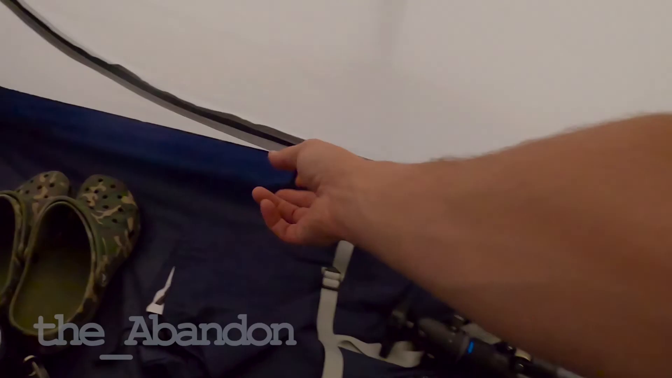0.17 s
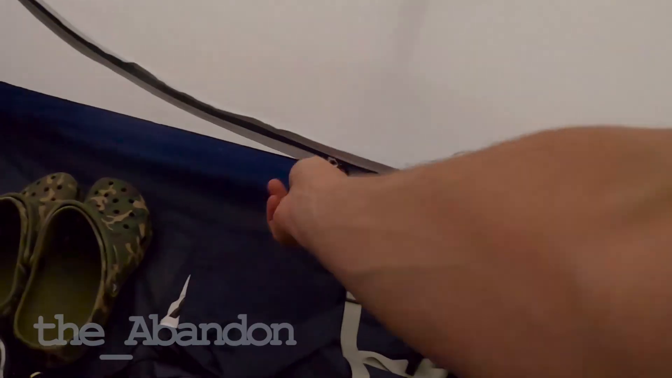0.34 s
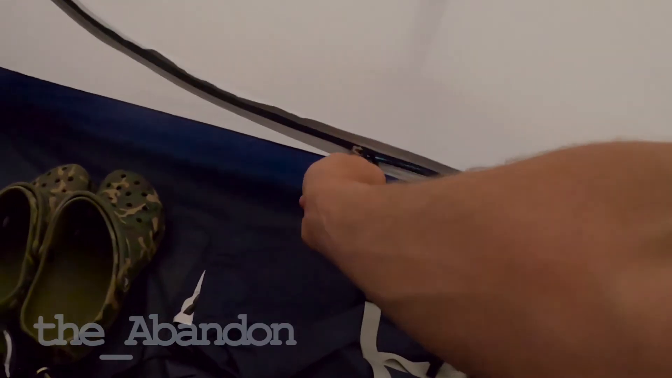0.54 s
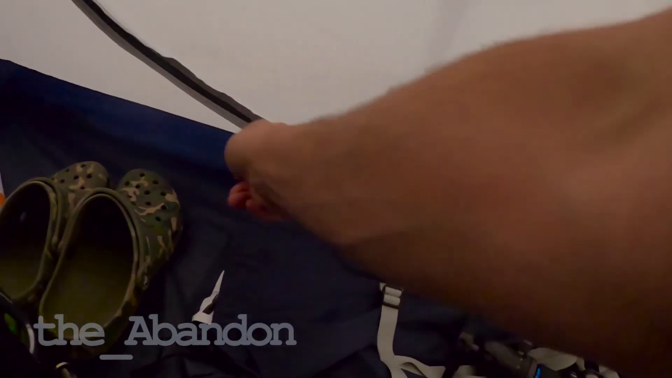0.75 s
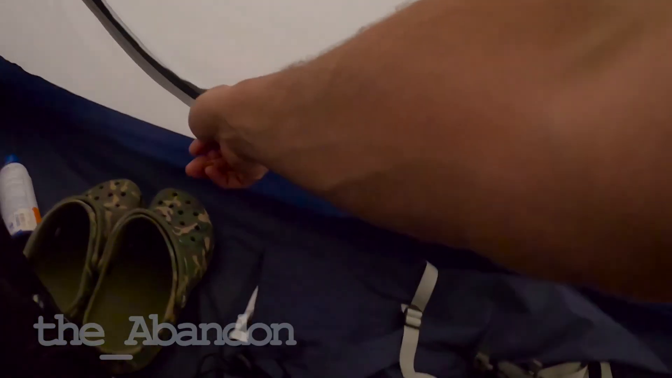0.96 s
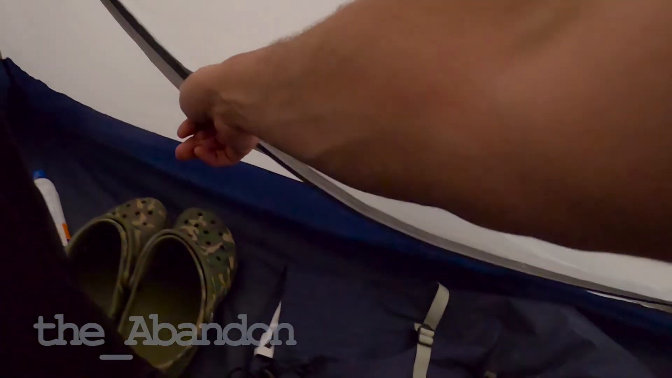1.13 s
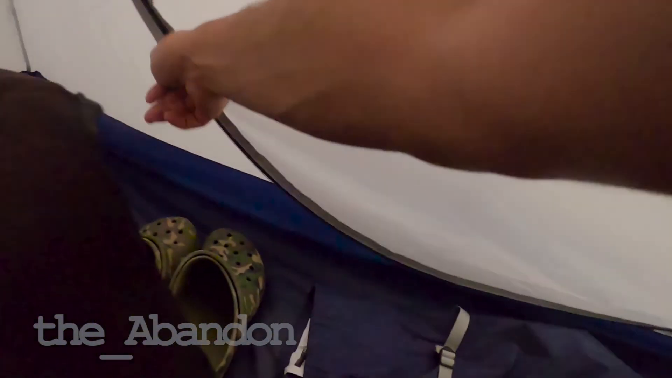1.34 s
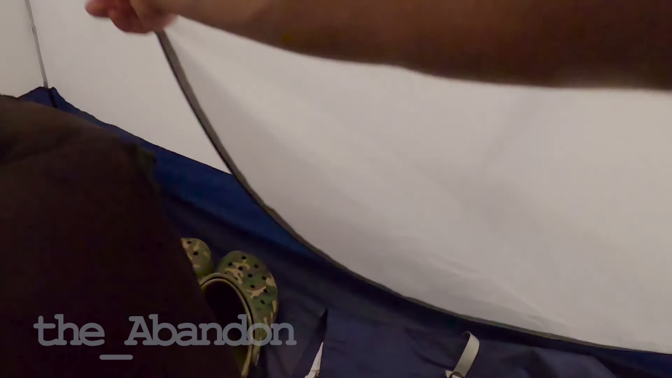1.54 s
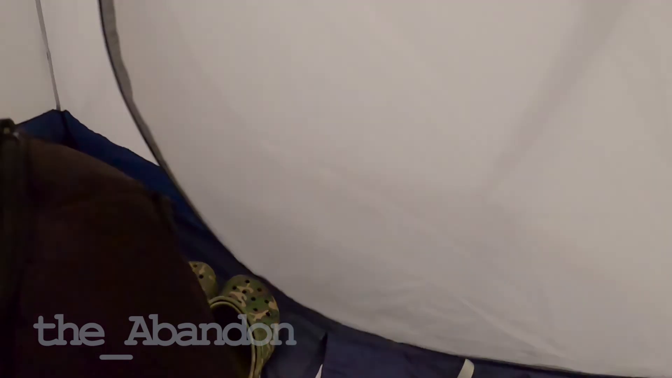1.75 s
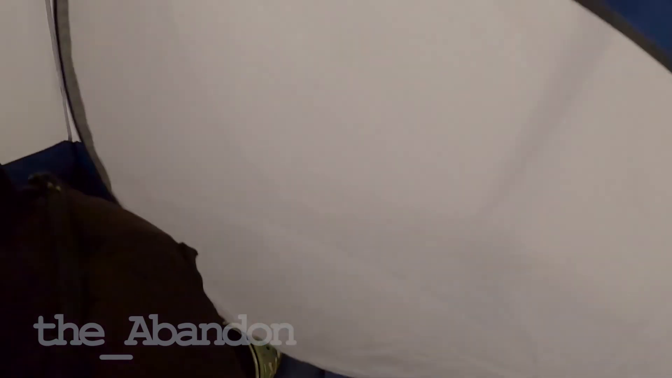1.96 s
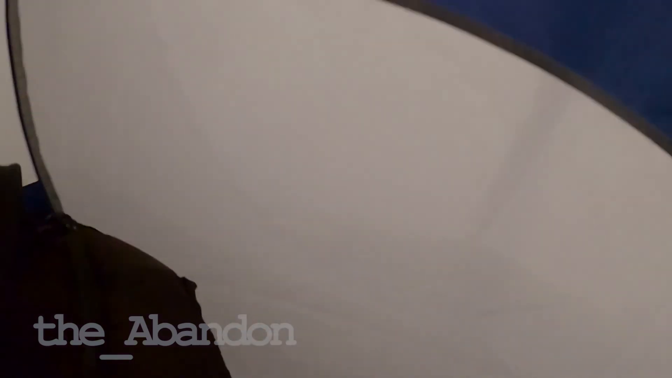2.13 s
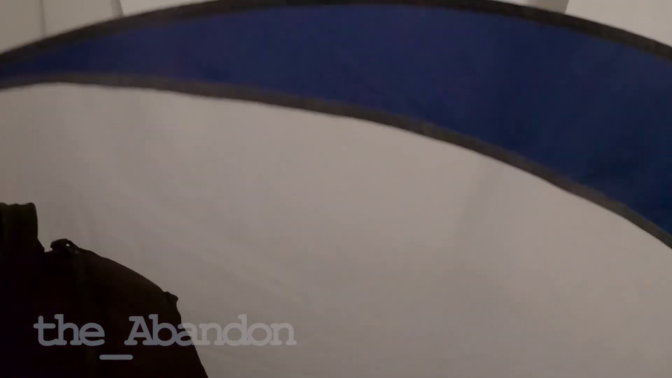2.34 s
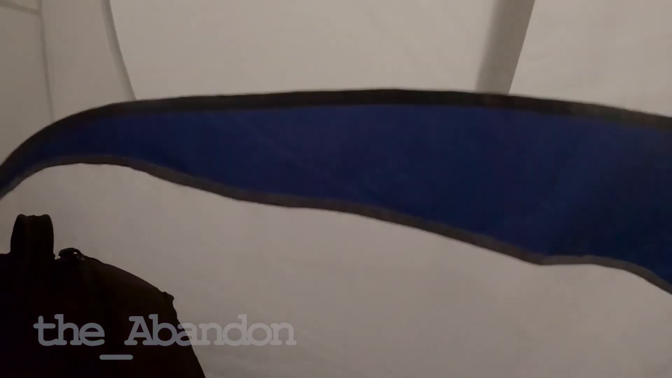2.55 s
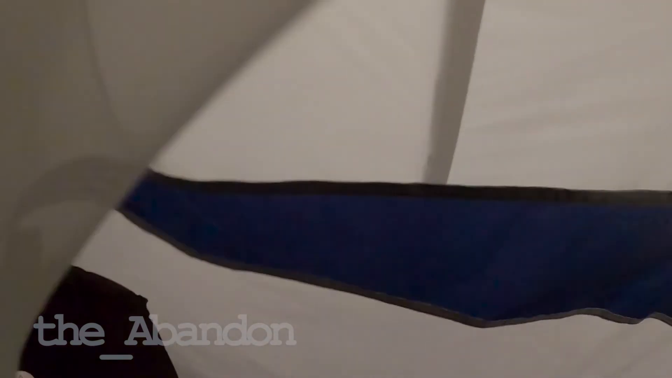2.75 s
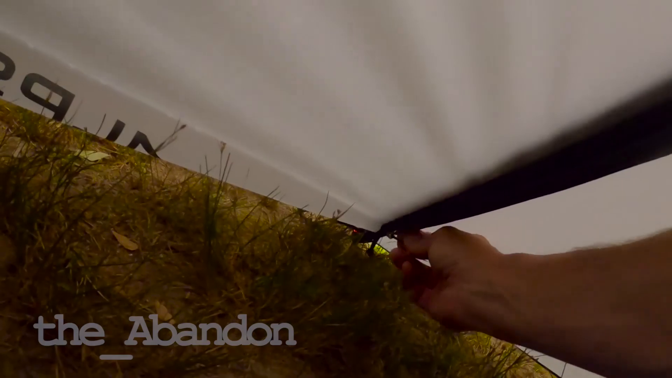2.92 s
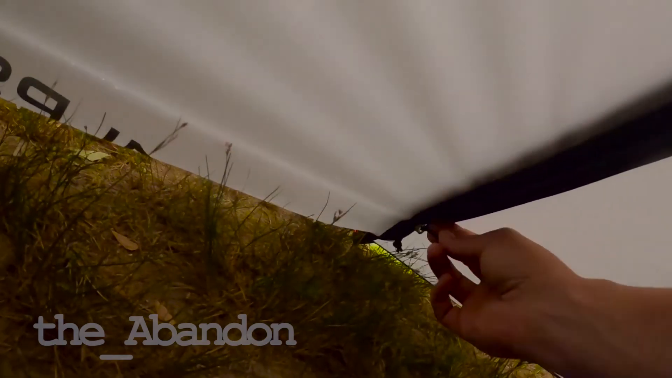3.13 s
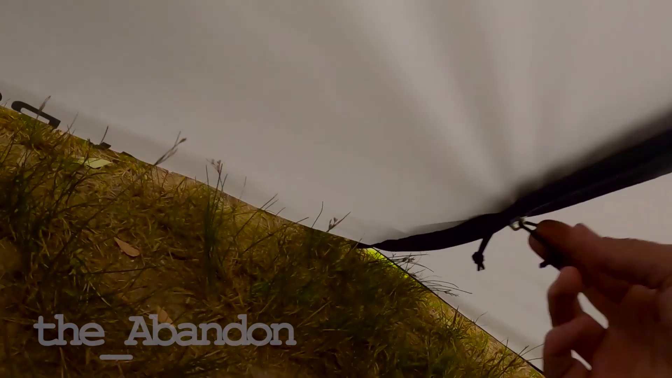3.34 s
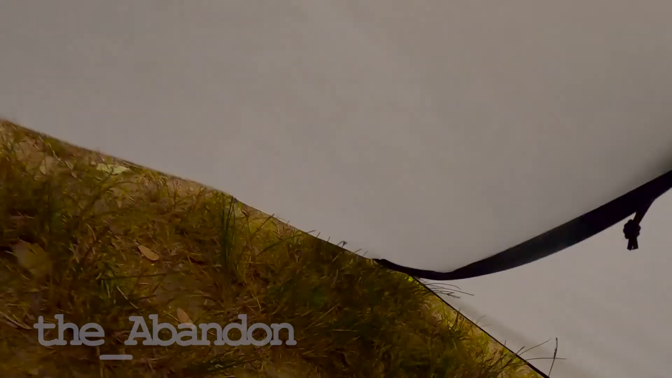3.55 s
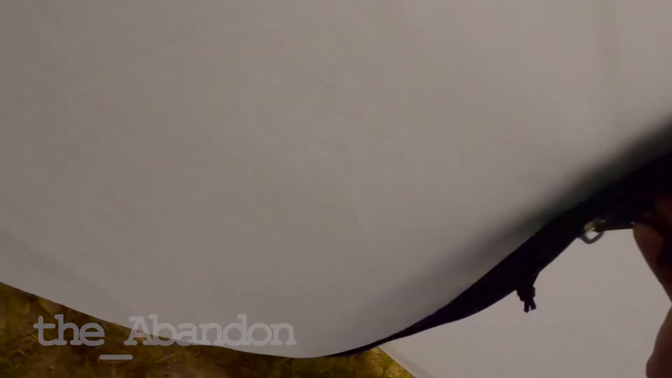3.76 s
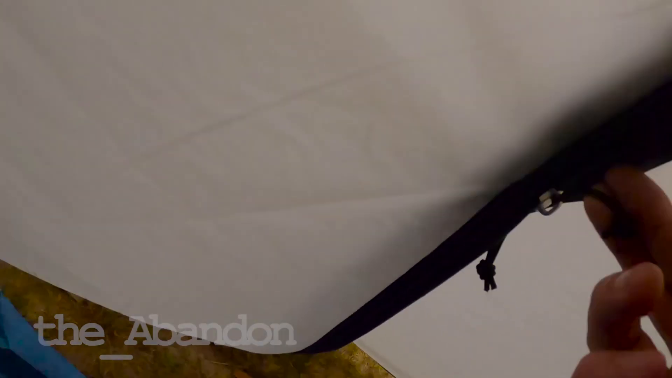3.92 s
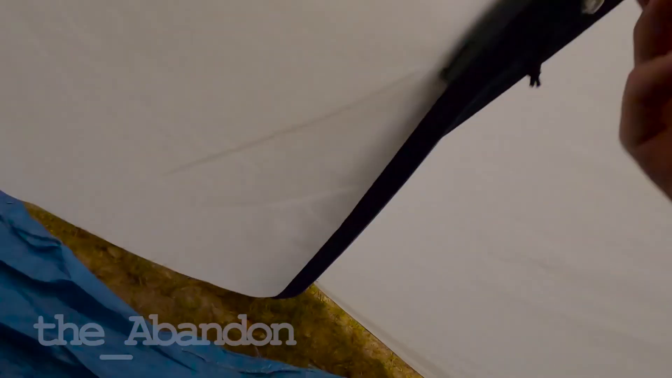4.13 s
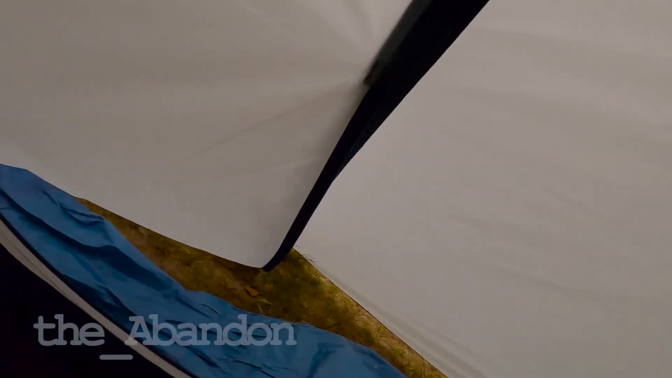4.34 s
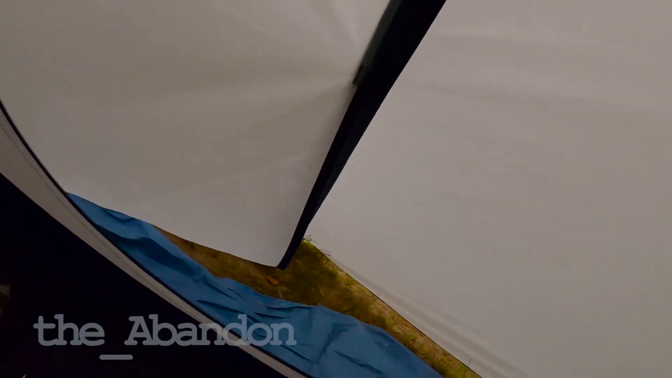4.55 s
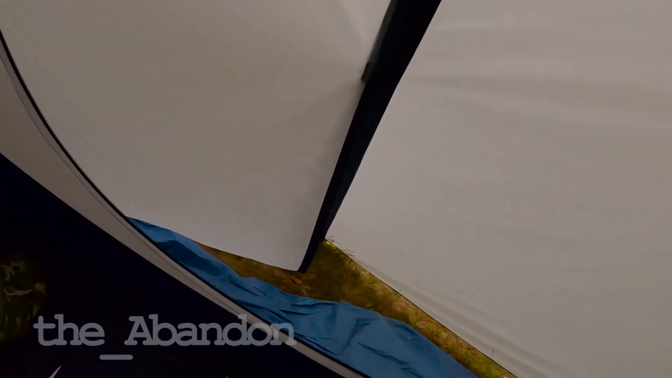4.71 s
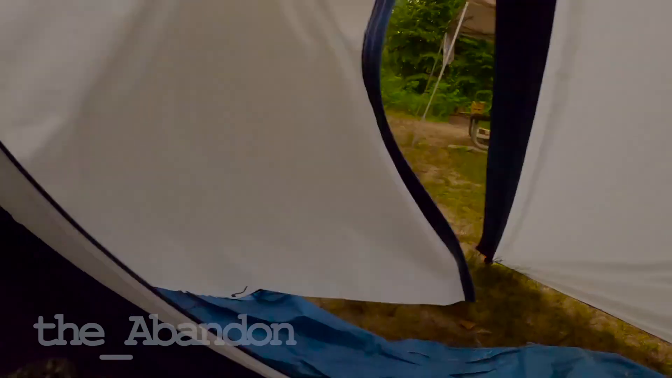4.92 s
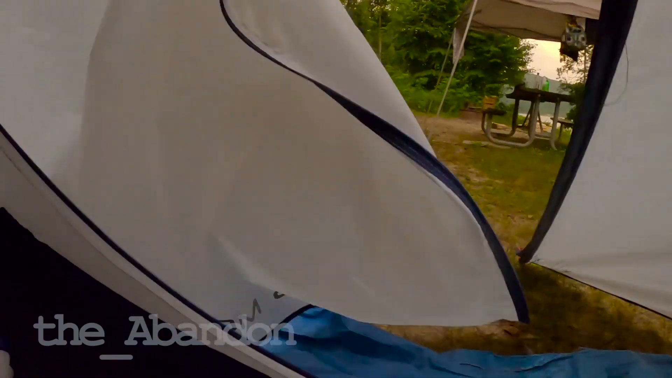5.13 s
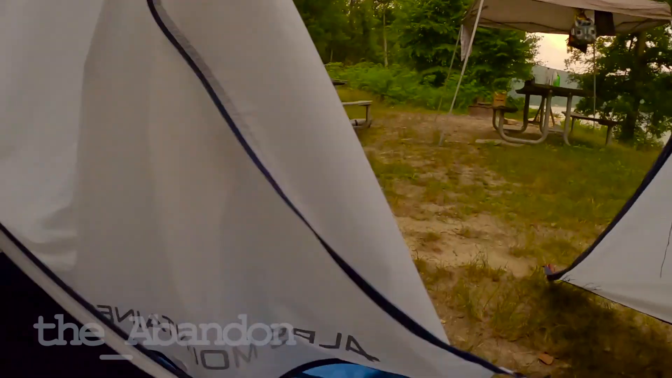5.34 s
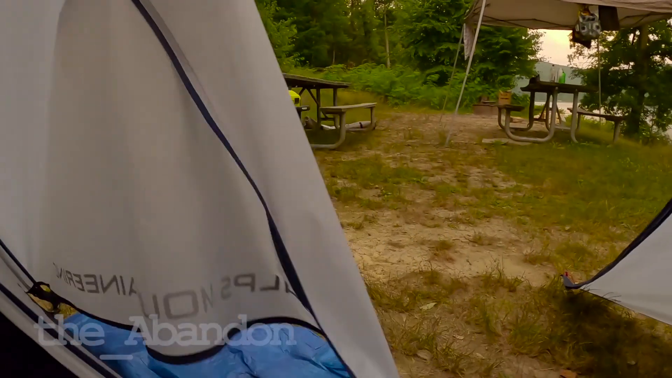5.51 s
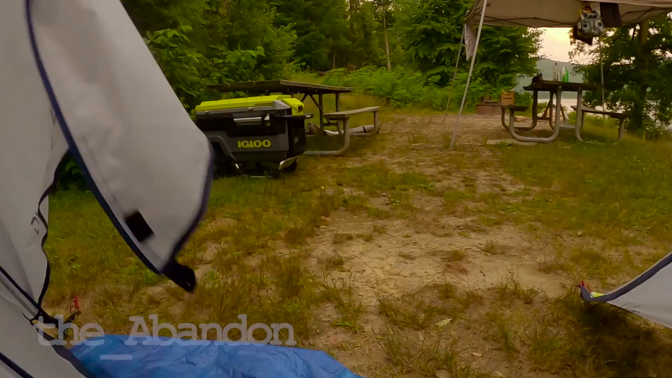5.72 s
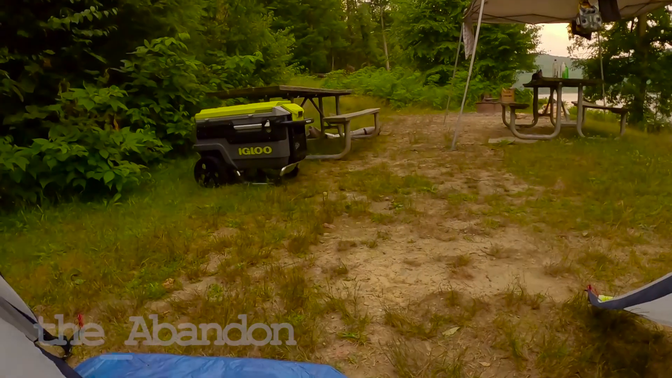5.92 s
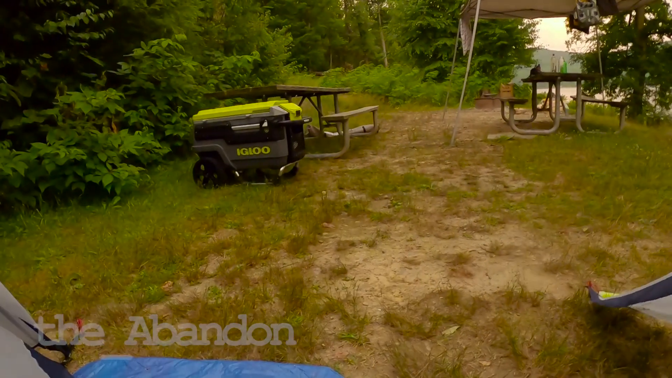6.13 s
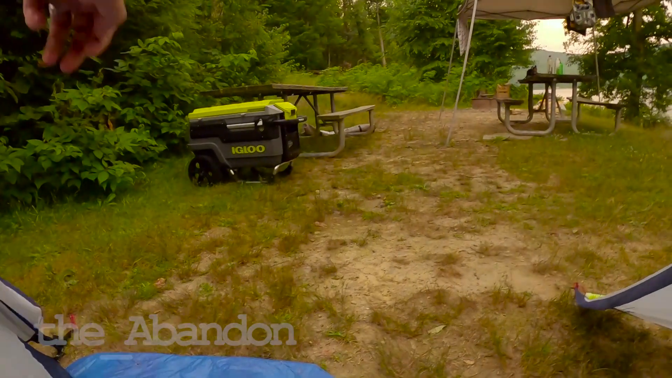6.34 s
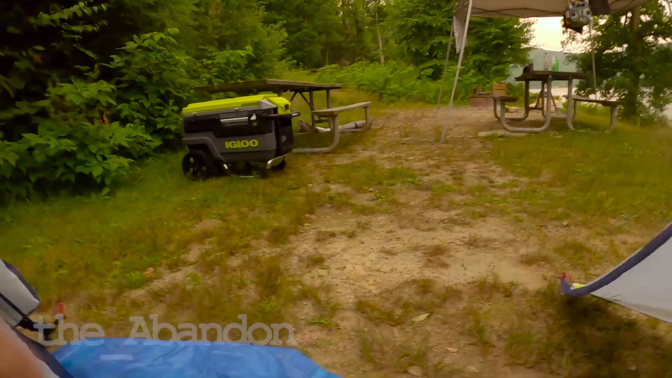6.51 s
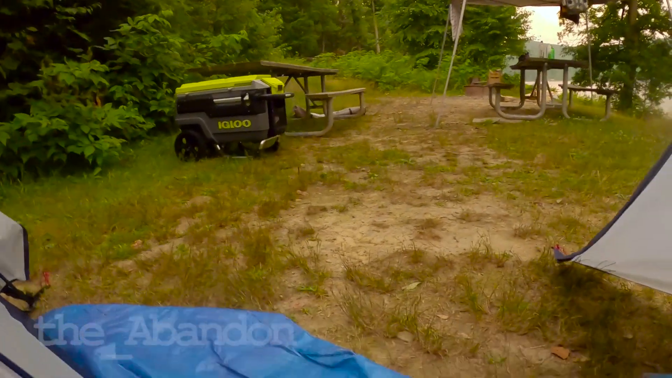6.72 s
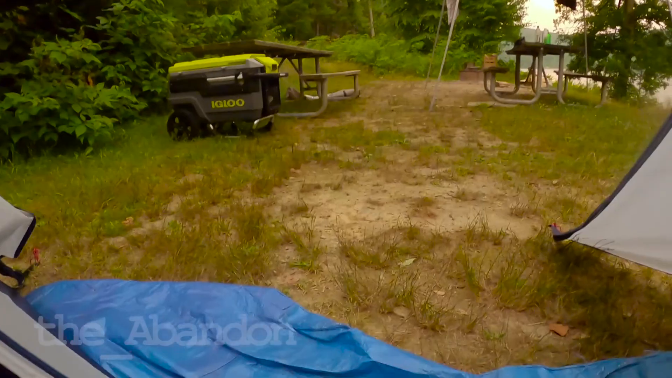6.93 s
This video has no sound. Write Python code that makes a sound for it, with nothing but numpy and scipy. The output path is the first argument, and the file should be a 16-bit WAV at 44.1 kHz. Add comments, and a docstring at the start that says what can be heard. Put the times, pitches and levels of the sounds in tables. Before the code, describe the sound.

Inside a small tent, very close and dry, a faint hiss precedes a light zipper pulled for two seconds, its buzz wavering and rising. A thump marks its end, then a heavier zipper starts with separate teeth and accelerates into a loud coarse rasp with the fabric wall drumming. A sharp nylon snap and rustle follow as the flap swings away, then quiet.

```python
"""Two door zippers are pulled open one after the other inside a tent, close to a small stereo camera.
The slider excites overtones of the tooth rate and scraping noise; the taut wall drums at the lowest three.
Then the flap is swept aside: filtered noise rustles, short noise bursts snap and damped swings thump.
Faint thin whistles are wavering near-sines; puffs of low-pressure noise and a steady hiss lie beneath."""
import sys
import numpy as np
from scipy import signal
from scipy.fft import rfft, irfft
from scipy.io import wavfile
from scipy.ndimage import uniform_filter1d

SR = 44100
rng = np.random.default_rng(int(sys.argv[2]) if len(sys.argv) > 2 else 0)


def master_out(mix):
    """Clip the mix to full scale and print it as 16-bit PCM to the path in sys.argv[1]."""
    frames = np.transpose(np.atleast_2d(mix))
    ceiling = np.clip(frames, -1, 1)
    pcm = np.round(ceiling * 32767).astype(np.int16)
    wavfile.write(sys.argv[1], SR, pcm)


N = 307465
EDGE_HZ = 15500  # upper band limit

# Rasp spectra, first the far light zipper, then the near heavy one: (frequency [Hz], gain [dB])
RASP_COLOURS = [
    [(60, -25), (200, -10), (600, -13.5), (1200, -9.5), (2200, -5), (3700, -2.5), (5300, -0.5), (7500, -6),
     (11000, -21.5), (15500, -31)],
    [(60, -25), (200, -6), (600, -3), (1200, -1), (2200, -4.5), (3800, 0.5), (5300, -4), (7500, -9),
     (11000, -20.5), (15500, -32.5)],
]
# Spectrum of sliding nylon, also used for the steady hiss: (frequency [Hz], gain [dB])
NYLON_COLOUR = [(90, 0), (150, -0.5), (380, -3), (600, -10), (1400, -7.5), (5000, -6), (7800, -11),
                (9000, -22), (12500, -29), (15500, -48)]


def gain_of(db):
    """Level to amplitude: 20 dB is a factor of ten."""
    return 10 ** (np.asarray(db) / 20)


def evened(x):
    """Normalization to an rms of 1."""
    return x / np.sqrt(np.mean(x ** 2) + 1e-20)


def read(points, hz):
    """Spectrum interpolated on a logarithmic frequency axis."""
    f, value = np.transpose(points)
    return np.interp(np.log(hz + 1), np.log(f + 1), value)


def add(mix, s, sound):
    """Superposition: a sound is summed into the mix from time s on."""
    part = mix[:, round(s * SR):][:, :sound.shape[-1]]
    part += sound[..., :part.shape[1]]


def unroll(rows):
    """Linear interpolation of a curve table: its start time and each column at every sample."""
    s, *columns = np.transpose(rows)
    t = np.arange(s[0], s[-1], 1 / SR)
    return s[0], [np.interp(t, s, c) for c in columns]


def drift(size, hz):
    """Low-passed noise of rms 1: a slow random course that changes about hz times a second."""
    span = int(SR / hz) + 1
    smooth = uniform_filter1d(rng.standard_normal(size), span)
    return evened(uniform_filter1d(smooth, span))


def colour(x, points):
    """Linear filtering: the spectrum is multiplied by the gains of a table."""
    gain = gain_of(read(points, np.fft.rfftfreq(len(x), 1 / SR)))
    return irfft(rfft(x) * gain, len(x))


def band(x, lo_hz, hi_hz):
    """Band-pass filtering between two frequencies."""
    return signal.sosfilt(signal.butter(2, [lo_hz, hi_hz], "bandpass", fs=SR, output="sos"), x)


def resonate(x, hz, width_hz):
    """Moving resonance by heterodyning: shift the curve hz to zero, smooth, and shift back."""
    turn = np.exp(2j * np.pi * np.cumsum(hz) / SR)
    r = np.exp(-np.pi * width_hz / SR)
    return 2 * (turn * signal.lfilter([1 - r], [1, -r], x / turn)).real


def panned(x, pan_db):
    """Interchannel level difference: left exceeds right by pan_db."""
    return np.array([x * gain_of(pan_db / 2), x * gain_of(-pan_db / 2)])


def placed(x, s):
    """Level difference that follows the hand from time s on, with faded ends."""
    # Side of the hand as the camera turns: (time [s], left minus right [dB])
    side = [(0, 4.5), (.72, -1.5), (1.4, -2), (2.15, 2), (2.9, 1.5), (3.001, -2.5), (4.1, -4.5), (4.9, -1),
            (5.499, -0.5), (5.75, 3), (6.97, 4.5)]
    t = s + np.arange(len(x)) / SR
    fade = signal.windows.tukey(len(x), 300 / len(x))
    return panned(x * fade, np.interp(t, *np.transpose(side)))


def zipper(rows, rasp, ring, blur_hz):
    """Periodic impact: knocks are overtones of the tooth rate, scraping pulses with it, the wall drums below."""
    ring_wander, ring_width = 0.04, .22  # in log frequency
    slow_body_db = 22  # slow knocks are fuller in the low overtones
    fizz = 0.37  # scraping that stays on above the knocks
    uneven_db = [2.6, 3.8, 4.2]  # unsteadiness of the three drum tones

    s, (hz, rasp_db, *drum_db) = unroll(rows)
    size = len(hz)
    ring_hz, clean = unroll(ring)[1]
    ring_hz = np.resize(ring_hz, size) * np.exp(ring_wander * drift(size, 16.0))
    clean = np.clip(np.resize(clean, size), 0, .95)

    slow = 1 / (1 + (hz / 380) ** 4)  # near 1 well below 380 teeth/s: the slider stumbles from tooth to tooth
    # the hand never moves quite evenly
    tremble = (1 + slow) * (.016 * drift(size, 40) + .016 * drift(size, 130))
    turns = np.cumsum(hz * (1 + tremble)) / SR  # teeth passed
    slips = turns + .021 * drift(size, 400)  # each tooth gives way a little early or late

    knocks = np.zeros(size)
    for k in range(4, 18):
        overtone_hz = k * hz
        ring_db = 11 / (1 + (np.log(overtone_hz / ring_hz) / ring_width) ** 2)
        body_db = slow_body_db * slow / (1 + (overtone_hz / 1900) ** 4)
        level_db = read(rasp, overtone_hz) + ring_db + 4.2 * drift(size, 44.2) + body_db
        melt = 1 + (overtone_hz / blur_hz) ** 6  # knocks melt into rasp above blur_hz
        phase = 2 * np.pi * (k * slips + 0.089 * rng.random())
        knocks += gain_of(level_db) / melt * np.cos(phase)
    knocks /= np.sqrt(uniform_filter1d(knocks ** 2, size=4000))  # running rms of 1

    tooth_pulse = 0.7 - 0.051 * slow + np.exp(-(turns % 1) / 1.3)
    pulses = tooth_pulse * gain_of(0.5 * drift(size, 55)) * rng.standard_normal(size)
    scrape = colour(pulses + 0.99 * resonate(pulses, ring_hz, 2000), rasp)
    scrape /= band(scrape, 1500, 6000).std()

    lurch = slips + .035 * slow * drift(size, 160)
    drum = np.zeros(size)
    for k, db in enumerate(drum_db):
        level = gain_of(db + uneven_db[k] * drift(size, 68))
        drum += level * np.cos(2 * np.pi * ((k + 1) * lurch + 0.15 * drift(size, 14.7)))

    fine_scrape = fizz * np.sqrt(clean) * band(scrape, blur_hz, EDGE_HZ)
    rasping = np.sqrt(clean) * knocks + np.sqrt(1 - clean) * scrape + fine_scrape
    sound = np.sqrt(2) * drum + gain_of(rasp_db) * rasping
    return s, placed(sound, s)


def tooth(s, peak_db):
    """Impulsive excitation: one dry click of the slider is coloured noise decaying exponentially."""
    t60_s = 0.017
    t = np.arange(1500) / SR
    click = colour(rng.standard_normal(len(t)), RASP_COLOURS[1]) * gain_of(-60 * t / t60_s)
    return s, gain_of(peak_db) * click / abs(click).max()


def rustle(rows):
    """Friction noise: the hiss of sliding nylon, modulated by tiny uneven crackles."""
    s, (swish_db, body_db) = unroll(rows)
    size = len(swish_db)
    crackle_db = 4 * np.minimum(rng.exponential(1, size), 4)
    crackle = gain_of(crackle_db) * (rng.random(size) < 160 / SR)  # about 160 a second
    crackle_decay = evened(signal.lfilter([1], [1, -.96], crackle))
    drive = rng.standard_normal(size) * (1 + .22 * crackle_decay)
    cloth = colour(drive * gain_of(1.3 * drift(size, 30)), NYLON_COLOUR)
    body = signal.sosfilt(signal.butter(2, 2000, fs=SR, output="sos"), cloth)  # low-pass at 2 kHz
    swish = cloth - body
    return s, gain_of(swish_db) * (evened(swish) + gain_of(body_db) * evened(body))


def snap(s, peak_db, hz, pan_db, t60):
    """Sudden tension of a fold: a tick and a noise band around its pitch, decaying exponentially."""
    t = np.arange(3000) / SR
    burst = rng.standard_normal(len(t)) * gain_of(-60 * t / t60) + 6.1 * (t == 0)
    burst = band(burst, hz / 2.2, min(hz * 1.35, 16000))
    burst = colour(burst, [(8000, -6), (15500, -29)])
    return s, panned(gain_of(peak_db) * burst / abs(burst).max(), pan_db)


def thump(s, peak_db, hz):
    """Damped oscillation of the wall, opening with a pressure dip; deep ones reach the ports out of step."""
    swings_to_60_db = 4.3  # swings until 60 dB down
    t = np.arange(8000) / SR
    sign = rng.choice([-1, 1]) * np.array([[1], [-1]])
    step = sign * .7 / (1 + (hz / 110) ** 4)  # radians, reached after half a swing
    phase = 2 * np.pi * hz * t + step * np.minimum(t * hz * 2, 1)
    swing = -np.sin(phase) * gain_of(-60 * t * hz / swings_to_60_db)
    return s, gain_of(peak_db) * swing / abs(swing).max()


def whistle(s, length, first_hz, last_hz, level_db):
    """Frequency modulation: a gliding near-sine wavers in pitch and level."""
    hz = np.linspace(first_hz, last_hz, round(length * SR))
    size = len(hz)
    phase = 2 * np.pi * np.cumsum(hz * (1 + .012 * drift(size, 200))) / SR
    tone = np.sin(phase) * gain_of(2.5 * drift(size, 120))
    return s, np.sqrt(2) * gain_of(level_db) * tone * signal.windows.tukey(size, .6)


def rumble():
    """Incoherent low-pressure noise at the two ports, in puffs that rise fast and fade exponentially."""
    # Puffs of air pushed by the walls onto the microphone:
    # (time [s], peak level before the port gains [dB], fading [dB/s])
    air_puffs = [(.74, -50, 152), (1.18, -52.5, 54), (2.851, -56, 700), (2.989, -45, 54),
                 (3.22, -43.5, 182), (3.53, -36, 58), (3.75, -34, 83), (4.02, -50, 19.5), (4.951, -55, 109),
                 (5.2, -57, 29), (5.86, -47, 400), (6.02, -54.5, 56), (6.48, -56, 34), (6.91, -59, 32)]
    # Spectrum of the rumble: (frequency [Hz], gain [dB])
    rumble_colour = [(15, -12), (40, 8.5), (90, 1.5), (160, 2), (300, -12), (600, -48)]
    rise_db_per_s, calm_db = 308, -70  # calm level before the port gains
    t = np.arange(N) / SR
    level = gain_of(calm_db)
    for s, db, fade in air_puffs:
        level = level + gain_of(db - np.maximum(rise_db_per_s * (s - t), fade * (t - s)))
    noises = []
    for _ in range(2):
        lumpy = rng.standard_normal(N) * gain_of(4.8 * drift(N, 37))
        noises.append(evened(colour(lumpy, rumble_colour)))
    return level * np.array(noises) * gain_of([[3], [5.5]])  # port gains, left and right


def hiss():
    """Stationary noise: a faint steady hiss with the spectrum of nylon."""
    return gain_of(-69.5) * evened(colour(rng.standard_normal(N), NYLON_COLOUR))


def ports(x):
    """Partial coherence: the left port lags, and scattering off the moving walls turns the phases at random."""
    # Coherence of the ports: (frequency [Hz], left-right likeness, clipped to 0.1-1 when used)
    likeness = [(60, -0.77), (150, 1), (380, 0.94), (950, 0.87), (2380, 0.78), (5980, 0.71), (15000, -1.32)]
    # Shading by the housing: (frequency [Hz], left minus right [dB])
    left_shade = [(3000, 2), (6000, 4), (12000, -3)]
    left_lag_s = .00005
    hz, _, z = signal.stft(x, SR, nperseg=512, noverlap=384)
    field = uniform_filter1d(rng.standard_normal(z[0].shape), size=6, axis=0)
    field = evened(uniform_filter1d(field, size=4, axis=1))
    # a Gaussian phase difference of this spread leaves the clipped likeness
    spread = np.sqrt(-2 * np.log(np.clip(read(likeness, hz), .1, 1)))[:, None] * field
    lag = 2 * np.pi * hz[:, None] * left_lag_s
    shade = np.log(gain_of(read(left_shade, hz)))[:, None]
    halves = np.array([1, -1])[:, None, None]  # half the difference to each port
    turned = z * np.exp(.5 * (shade - 1j * (lag + spread)) * halves)
    return signal.istft(turned, SR, nperseg=512, noverlap=384)[1][:, :N]


def scene():
    """Superposition of all sources; snaps, thumps and rumble bypass the phase scattering."""
    # Slider, one table a pull: (time [s], tooth rate [1/s], rasp level [dB],
    # wall drum level at one, two and three times the tooth rate [dB, dB, dB])
    pulls = [
        [(0.71, 405.0, -39, -75, -76, -45), (0.73, 395, -32.5, -45.5, -55, -50),
         (0.78, 470, -35, -62, -54, -53), (0.86, 285, -41.5, -43.5, -54, -62),
         (0.915, 280, -37.5, -38, -56, -60), (0.935, 320, -38, -59, -51.5, -48),
         (1.03, 360, -38.5, -58, -48, -53), (1.11, 223, -42.5, -38.5, -64, -60),
         (1.18, 260, -42, -42.5, -57, -48), (1.31, 240, -42, -40.5, -58, -50),
         (1.335, 312.7, -40, -52, -51, -45), (1.37, 370, -38, -61, -55, -47),
         (1.44, 358, -38.5, -53, -48.5, -53), (1.5, 424, -39.5, -55, -61, -46),
         (1.61, 614, -38, -52.5, -50, -55), (1.67, 540, -38, -52.5, -62, -48), (1.75, 680, -38, -52, -48, -58),
         (1.8, 655, -37.5, -46, -46.5, -47), (1.92, 774, -33, -59, -42, -43), (1.94, 776, -30, -57, -44.5, -43),
         (2.21, 696, -31, -55, -49.5, -47.5), (2.25, 605, -33, -48, -49, -49),
         (2.29, 650, -33.5, -53, -39, -60), (2.33, 713, -32, -65, -49, -37.5), (2.47, 746, -36, -49, -57, -60),
         (2.51, 775, -37.5, -47, -58, -44), (2.55, 680, -36, -52, -55, -53),
         (2.614, 525, -38.5, -45, -38.5, -52), (2.67, 463, -37.5, -49.5, -39, -47),
         (2.78, 444, -36.5, -50, -55, -55), (2.81, 634, -33.5, -53, -48, -43), (2.84, 630, -31, -44, -45, -56)],
        [(2.988, 113.8, -28, -49, -45, -57), (2.998, 104, -40, -25, -27.5, -44),
         (3.089, 176, -36.5, -28.5, -32.5, -39), (3.136, 190, -35.5, -31, -35.5, -37),
         (3.19, 278, -32, -29, -37.5, -44), (3.211, 313, -31.5, -40, -33, -44),
         (3.24, 410, -31, -34, -33.5, -48), (3.286, 430, -28, -35, -44, -48),
         (3.328, 454, -26, -45, -35, -41.5), (3.358, 486, -29, -30, -49, -41.5),
         (3.436, 438, -30, -52, -44, -31.5), (3.456, 450, -27.5, -44, -61, -34),
         (3.518, 420, -31.5, -43, -38, -32), (3.574, 413, -33.5, -37.5, -39, -48.5),
         (3.626, 476, -31, -43, -40, -37.5), (3.744, 525, -29, -24.5, -32, -41),
         (3.806, 523, -29.5, -30, -47, -40), (3.826, 440, -31.5, -39.5, -35, -44),
         (3.966, 530, -30.5, -26.5, -36, -43.5), (4.018, 545, -29, -34.5, -34, -34),
         (4.038, 527, -32, -31, -33, -44), (4.188, 642, -28, -33.5, -40.5, -32),
         (4.27, 787, -28, -34, -30, -29.5), (4.34, 704, -33.5, -37.5, -38.5, -40),
         (4.388, 797, -33.5, -28, -35, -36), (4.518, 646, -33.5, -35.5, -41, -41),
         (4.538, 540, -35, -33, -38, -62), (4.6, 720, -35.5, -36.5, -44, -46),
         (4.688, 642, -36.5, -37, -54.5, -42.5), (4.838, 654, -40, -43.5, -44.5, -55)],
    ]
    # Ring of the tape as its tension changes, one table a pull:
    # (time [s], frequency [Hz], share of clear knocks, at most 0.95 when used)
    rings = [
        [(.71, 3300, 0.26), (.8, 5050, 0.54), (1.05, 4200, 0.37), (1.23, 2340, 0.55), (1.45, 3100, 0.46),
         (1.8, 2470, 0.22), (1.92, 3670, 0.68), (2.02, 5250, 0.88), (2.09, 3650, 0.8), (2.4, 3500, 0.83),
         (2.6, 3465, 0.34), (2.7, 1832, 0.29), (2.84, 2200, 1)],
        [(2.99, 2700, 0.97), (3.2, 3520, 0.05), (3.33, 3030, 0.86), (3.45, 1898, 0.59), (3.56, 1600, 0.28),
         (3.9, 2520, 0.22), (4.13, 1918, 0.53), (4.24, 3242, 0.42), (4.3, 2140, 0.4), (4.48, 2700, 0.31),
         (4.7, 2100, 0.12), (4.84, 2703, 0.4)],
    ]
    # Above this the knocks of each zipper melt into rasp: one frequency a pull [Hz]
    blurs_hz = [5500, 3600]
    # First slow teeth of the heavy zipper, heard one by one: (time [s], peak level [dB])
    first_teeth = [(2.995, -29), (3.001, -24), (3.019, -32), (3.028, -37), (3.038, -37), (3.045, -38),
                   (3.052, -28)]
    # Sliding nylon, one table a stretch: (time [s], swish level [dB], lower body against the swish [dB])
    rustles = [
        [(0.0, -64, -4), (0.148, -65, -2.5), (0.494, -68.5, 5), (0.514, -67.5, -2.5), (0.7, -59, 1)],
        [(2.84, -32, 4), (2.916, -51, -21), (2.99, -41.5, -12)],
        [(4.84, -50, -19), (4.88, -60.5, -18), (4.93, -21, -4.5), (4.96, -24.5, -0.5), (4.97, -35.5, -1),
         (5.07, -45, 3.5), (5.25, -43, -0.5), (5.47, -40, -6.5), (5.6, -45.5, -2), (5.64, -36.5, -5),
         (5.74, -29.5, -33), (5.79, -33, -5), (5.92, -38, -5), (6, -42, 0.5), (6.13, -48.5, 3.5),
         (6.21, -53.5, -3.5), (6.27, -51.5, -6.5), (6.38, -54.5, -10), (6.5, -53, -5), (6.71, -53.5, -5),
         (6.76, -48.5, -7), (6.87, -46, -20), (6.97, -48, 2.5)],
    ]
    # Folds snapping taut: (time [s], peak level before panning [dB], pitch [Hz],
    # left minus right [dB], decay time to -60 dB [s])
    snaps = [(0.515, -50, 7460, -3, 0.17), (4.896, -28.5, 570, 2, 0.053), (4.917, -21, 1130, 2, 0.062),
             (4.95, -13, 1450, -3, 0.012), (5.183, -26, 2420, -4, 0.035), (5.316, -34, 2110, -2, .03),
             (5.4, -34, 1200, 0, 0.043), (5.44, -32.5, 1500, 5, 0.03), (5.642, -23.5, 1450, 2, 0.06),
             (5.655, -34, 1410, -10, 0.015), (5.796, -20.5, 1510, 5, 0.012), (5.893, -24, 1330, 11, 0.065),
             (6.128, -33.5, 2120, 8, 0.041), (6.28, -39, 1900, 19, 0.03), (6.501, -38, 4430, 8, 0.047),
             (6.754, -40, 2740, 17, .04), (6.854, -24.5, 8750, 7, 0.058)]
    # Jolts of the wall: (time [s], peak level [dB], pitch [Hz])
    thumps = [(0.107, -47, 62), (2.841, -18, 169), (2.864, -29, 58.3), (2.97, -22.5, 213),
              (3.005, -14.5, 213), (3.741, -14, 66.5), (4.897, -29, 41.2), (4.912, -18, 143),
              (4.951, -18.5, 87), (4.958, -22.5, 37.8), (5.612, -29.5, 145), (5.693, -23.5, 90),
              (6.903, -36, 54.4)]
    # Faint thin whistles: (time [s], length [s], first frequency [Hz], last frequency [Hz], level [dB])
    whistles = [(0.544, 0.12, 5120, 5260, -63), (0.61, 0.1, 1520, 1610, -64),
                (2.93, 0.041, 6250, 4900, -42), (6.078, 0.025, 4130, 3550, -52),
                (6.11, 0.017, 4300, 3400, -51), (6.212, 0.085, 4940, 4880, -55),
                (6.297, .035, 5250, 3700, -55), (6.434, 0.062, 4030, 5230, -58)]

    mix, hits = np.zeros((2, 2, N))
    for pull in zip(pulls, RASP_COLOURS, rings, blurs_hz):
        add(mix, *zipper(*pull))
    for row in first_teeth:
        add(mix, *tooth(*row))
    for rows in rustles:
        add(mix, *rustle(rows))
    for row in snaps:
        add(hits, *snap(*row))
    for row in thumps:
        add(hits, *thump(*row))
    for row in whistles:
        add(mix, *whistle(*row))
    mix += hiss()
    return ports(mix) + hits + rumble()


def record(dry):
    """Band limitation: a linear-phase low-pass at the upper edge."""
    lowpass = signal.firwin(511, EDGE_HZ, window=("kaiser", 9), fs=SR)
    return signal.oaconvolve(dry, lowpass[None], "same")


dry = scene()
out = record(dry)
master_out(out)
```